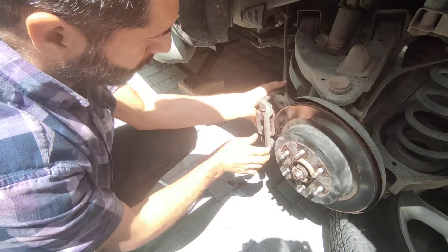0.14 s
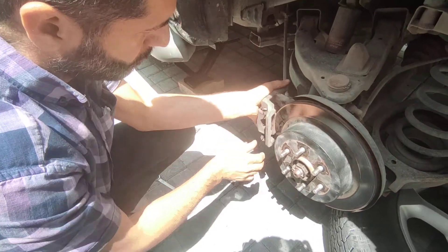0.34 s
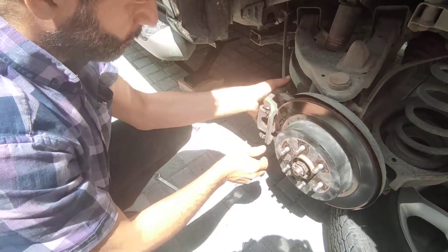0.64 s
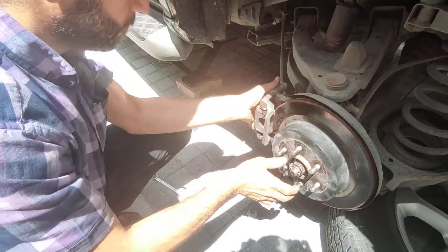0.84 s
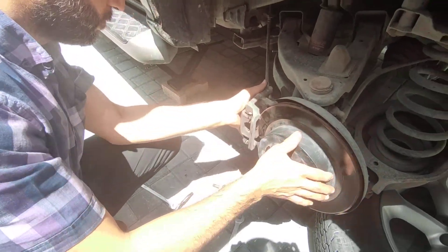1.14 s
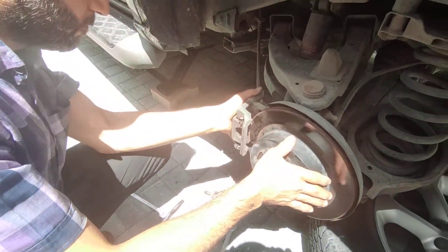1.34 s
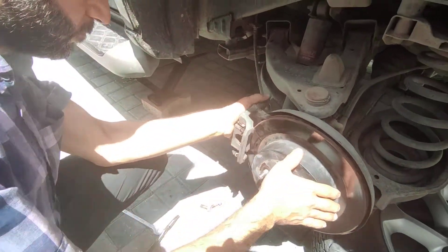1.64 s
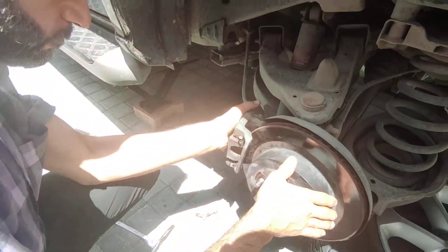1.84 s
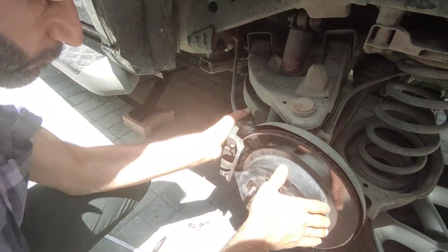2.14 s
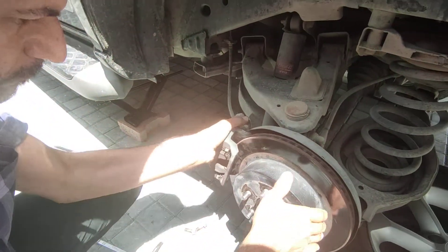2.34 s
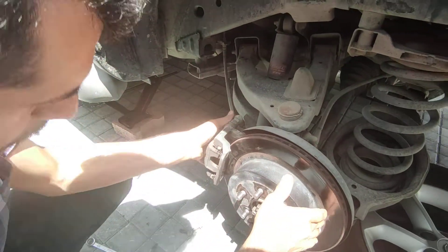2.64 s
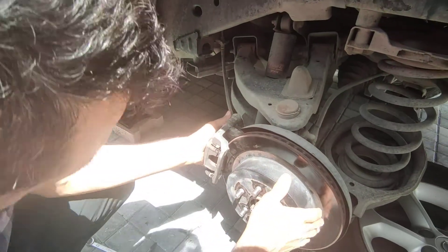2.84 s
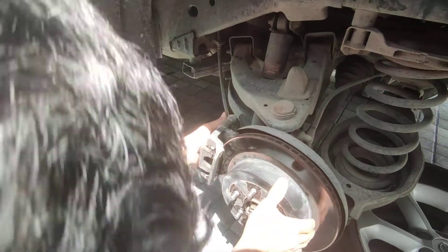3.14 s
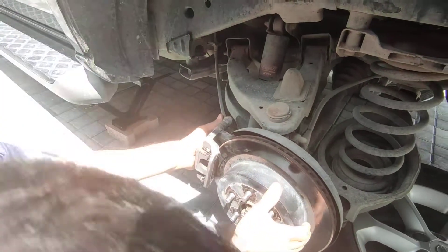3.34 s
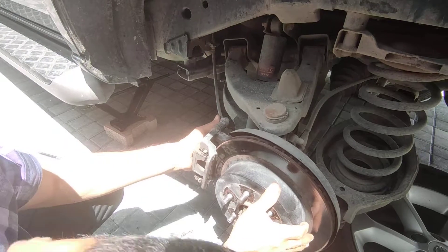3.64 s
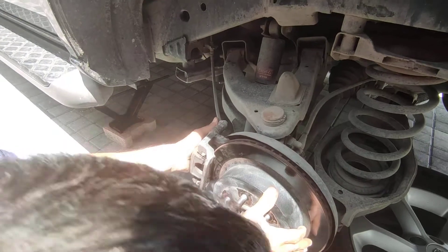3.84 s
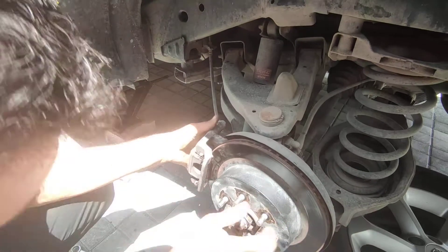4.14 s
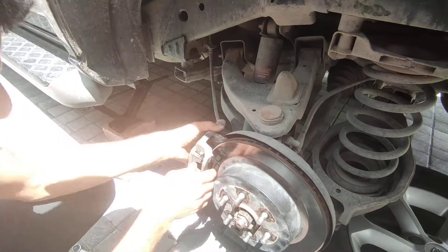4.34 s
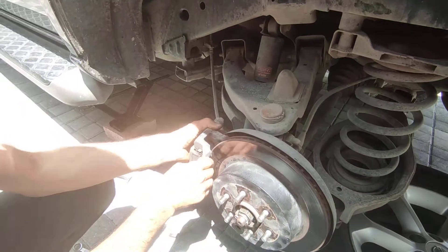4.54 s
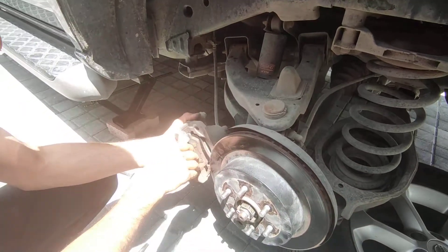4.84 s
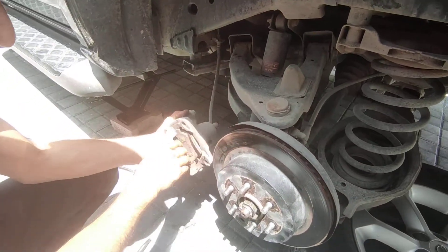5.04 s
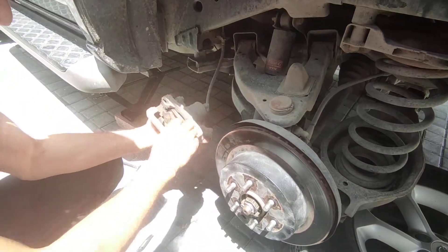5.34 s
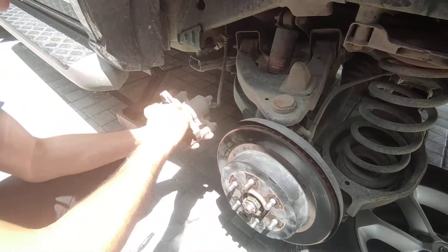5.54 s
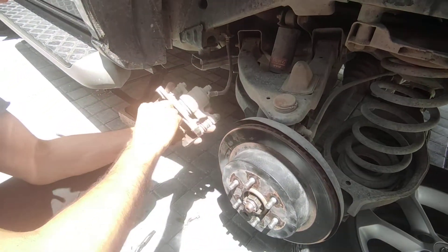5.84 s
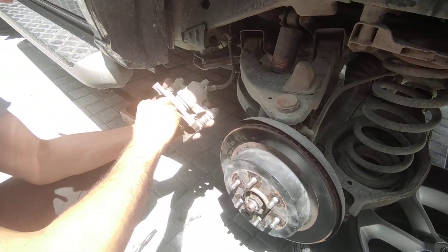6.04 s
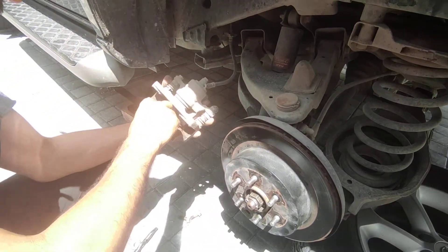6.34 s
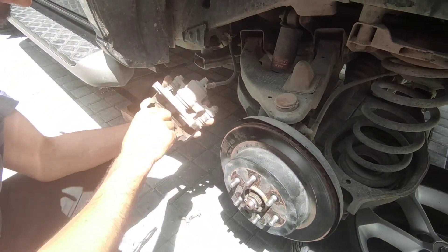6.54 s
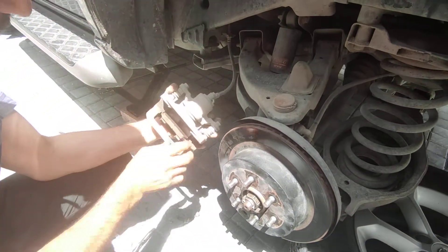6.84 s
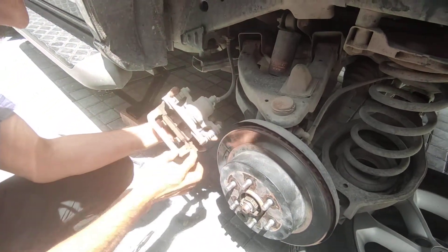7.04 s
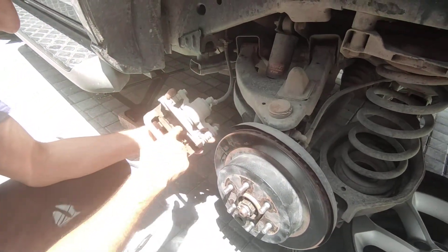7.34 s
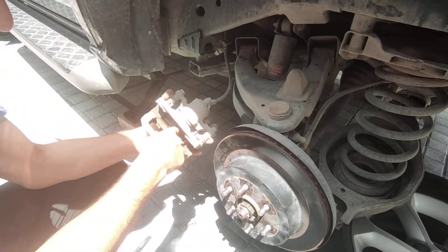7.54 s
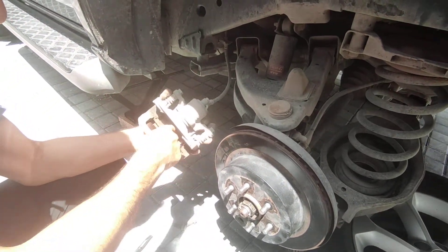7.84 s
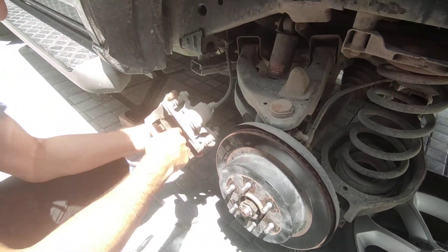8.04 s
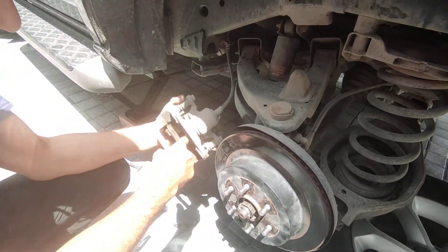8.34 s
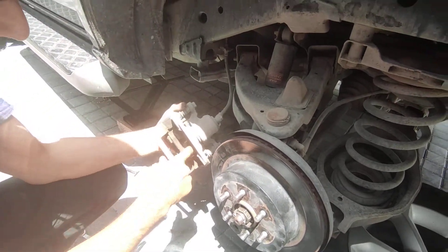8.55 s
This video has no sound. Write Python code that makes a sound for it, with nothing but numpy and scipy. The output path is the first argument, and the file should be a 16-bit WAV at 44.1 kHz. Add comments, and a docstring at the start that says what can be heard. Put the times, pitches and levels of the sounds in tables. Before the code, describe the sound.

Brake disc clunks and rings under rocking hands, a caliper scrapes off and clicks, while wind buffets the microphone and sparrows chirp.

```python
"""Hands close to two microphone ports, outdoors, rock a brake disc, slide the caliper off and finger its pads.
Blows and small hard clicks ring sets of modes and crunch as gritty noise, among rubs, scrapes and squeaks.
Gusts buffet the ports, the left one most, as slow rumble, lumpy flutter and pops.
Sparrows chirp as hoarse gliding tones to the right, a dove coos far off, and the town hums and hisses."""
import sys
import numpy as np
from scipy import signal
from scipy.fft import rfft, irfft, next_fast_len
from scipy.io import wavfile
from scipy.ndimage import uniform_filter1d, map_coordinates

SR = 44100
rng = np.random.default_rng(int(sys.argv[2]) if len(sys.argv) > 2 else 0)


def master(y):
    """Save y as 16-bit WAV."""
    cut = np.clip(np.atleast_2d(y).T, -1, 1)
    pcm = np.round(cut * 32767)  # scale
    wavfile.write(sys.argv[1], SR, pcm.astype(np.int16))


N = 383714

# Modes of the brake disc. Each row: frequency in Hz, relative level in dB, t60 in s.
DISC_MODES = [(493, -2.5, 0.69), (640.3, -3, 0.17), (752, -8, 0.32), (880, -8, 0.54), (1028, -8, 0.43),
              (1291, -11, 0.13), (1382, -12, 1.45), (1529, 0.5, 0.11), (1727, -5.5, 0.19),
              (1804, -14, 0.43), (1936, -9.5, 0.17), (2234, -9, 0.23), (2350, -18, 0.64), (2492, -13, 0.36)]
# Modes of the caliper. Each row: frequency in Hz, relative level in dB, t60 in s.
CALIPER_MODES = [(525, 0.5, 0.064), (946, -3, 0.42), (1539, -8.5, 0.16), (1665, -9.5, 0.097),
                 (1926, -3, 0.4), (2190, -14.5, 0.3), (3050, -22, 0.63), (4330, -24, .3), (5780, -31, 0.37),
                 (6970, -20, 0.38), (7200, -17, .25), (8290, -10, 0.048), (8700, -23, 0.33)]
# Spectrum of a broad gritty contact. Each row: frequency in Hz, relative density in dB per Hz.
IRON_SPECTRUM = [(200, -7), (500, -.5), (1000, -5.5), (2300, -12.5), (3500, -21), (6000, -53.5)]
# How alike near sounds reach the two ports. Each row: frequency in Hz, left-right likeness (0 to 1).
NEAR_LIKENESS = [(200, 0.95), (1000, 0.52), (2500, 0.13), (8000, 0.00996)]


def amp(db):
    """Decibels to an amplitude factor."""
    return 10 ** (np.asarray(db) / 20)


def unit(x):
    """x scaled to an rms of 1 in each channel."""
    return x / np.sqrt(np.mean(x ** 2, axis=-1, keepdims=True) + 1e-20)


def along(points, hz):
    """Reads a curve of (Hz, value) points on a log frequency axis."""
    f, v = np.transpose(points)
    return np.interp(np.log(hz + 1), np.log(f + 1), v)


def wobble(rate, size=N):
    """A smooth random curve with rate knots a second."""
    knots = rng.standard_normal(int(size * rate / SR) + 4)
    return map_coordinates(knots, [np.arange(size) * rate / SR])


def filtered(x, response):
    """x through a filter given as a function of frequency in Hz."""
    m = next_fast_len(x.shape[-1] + 8192)
    spectrum = rfft(x, m) * response(np.fft.rfftfreq(m, 1 / SR))
    return irfft(spectrum, m)[..., :x.shape[-1]]


def noise(spectrum, alike, body=np.ones_like):
    """Stereo noise of rms 1 whose channels share part of their motion, set by frequency."""
    def middle_and_side(hz):
        turn = np.arccos(np.clip(along(alike, hz), -1, 1)) / 2
        return body(hz) * amp(along(spectrum, hz)) * [np.cos(turn), np.sin(turn)]

    mid, side = filtered(rng.standard_normal((2, N)), middle_and_side)
    return unit(np.array([mid + side, mid - side]))


def add(track, s, sound):
    """Mixes a sound into the track at time s."""
    part = track[..., round(max(s, 0) * SR):][..., :sound.shape[-1]]
    part += sound[..., :part.shape[-1]]


def echoes(x, t60, wet_db, dull_hz):
    """x with a diffuse, dulled tail that differs between the channels."""
    t = np.arange(SR // 2) / SR
    tail = rng.standard_normal((2, len(t))) * amp(-60 * t / t60)
    wet = signal.fftconvolve(x, tail / np.linalg.norm(tail[0]), axes=1)[:, :N]
    return x + amp(wet_db) * filtered(wet, lambda hz: 1 / (1 + 1j * hz / dull_hz))


def patchy(x, depth_db):
    """x under a random gain field: rough surfaces excite now one pitch region, now another."""
    z = signal.stft(x, nperseg=256)[2]
    field = uniform_filter1d(rng.standard_normal(z.shape[1:]), size=4, axis=0)
    field = uniform_filter1d(field, size=8, axis=1)
    return signal.istft(z * amp(depth_db * field / field.std()), nperseg=256)[1][:, :N]


def resonant(modes, width_hz, peak_db):
    """What a held part does to grit that passes through it: its damped modes stand out."""
    def response(f):
        peaks = sum((-1) ** k * 1j * f * width_hz / (hz * hz - f * f + 1j * f * width_hz)
                    for k, (hz, _, _) in enumerate(modes))
        return 1 + amp(peak_db) * peaks

    return response


def struck(blows, modes, crunch_t60, chatter_db, pan_db, focus):
    """Every blow is a gritty crunch and rings the given modes, most those near the pitch it favours."""
    # Spectrum of a small hard contact. Each row: frequency in Hz, relative density in dB per Hz.
    thin_spectrum = [(300, -45.5), (1000, -8), (2000, -1.5), (4000, -6.5), (7300, 2.5), (10000, -13),
                     (15500, -32.5)]
    linger_db = -28.5  # the share of each ring that the hand does not damp
    quench_db, quench_s = -7, 0.0043  # a new contact chokes what still rings
    ring, broad, thin = np.zeros((2, N)), np.zeros(N), np.zeros(N)
    t = np.arange(SR * 3 // 4) / SR
    hz, mode_db, t60 = np.transpose(modes)
    luck = rng.standard_normal((len(blows), 3, len(modes)))
    swing = np.exp(2j * np.pi * hz[:, None] * t) * amp(-60 / t60[:, None] * t)
    swing = swing * (1 - np.exp(-t / 0.00044))  # soft onset
    choke = (amp(quench_db) - 1) * (1 - np.exp(-t / quench_s))
    contact = amp(-60 * t / crunch_t60) * (1 - np.exp(-t / 0.0022))

    for (s, crunch_db, ring_db, favoured_hz, damping), (size, lean, turn) in zip(blows, luck):
        level = ring_db + mode_db + 2 * size - focus * np.log2(hz / favoured_hz) ** 2
        # a mode radiates unevenly: the ports get it at their own level and phase, more so in the treble
        apart = np.arccos(np.clip(along(NEAR_LIKENESS, hz), -1, 1)) * turn
        ports = np.array([amp(level + side * lean) * np.exp(.5j * side * apart) for side in (1, -1)])
        bell = (ports @ swing).imag * (amp(-abs(damping) * t) + amp(linger_db))
        # the first touch is followed by a chatter of tiny rebounds over the rust
        chatter = contact[:SR // 10] * rng.standard_normal(SR // 10) ** 3
        chatter = amp(chatter_db) * chatter / np.linalg.norm(chatter)
        touch = chatter + signal.unit_impulse(SR // 10)
        start = round(s * SR)
        still_ringing = ring[:, start:][:, :len(t)]
        add(ring, s, still_ringing * choke[:N - start])
        add(ring, s, signal.fftconvolve(bell, touch[None], axes=1))
        # a small hard contact favours high modes and crunches thin
        hardness = 1 / (1 + (1800 / favoured_hz) ** 4.07)
        add(broad, s, amp(crunch_db) * np.sqrt(1 - hardness) * contact)
        add(thin, s, amp(crunch_db) * np.sqrt(hardness) * contact)

    body = resonant(modes, width_hz=60, peak_db=8)
    crunch = broad * noise(IRON_SPECTRUM, NEAR_LIKENESS, body) + thin * noise(thin_spectrum, NEAR_LIKENESS)
    grit = amp(1.5 * wobble(180)) * crunch
    rattle = amp(2.3 * wobble(110))  # loose parts shake against each other while they ring
    pan = amp([[pan_db / 2], [-pan_db / 2]])
    return (ring * rattle + patchy(grit, depth_db=3.5)) * pan


def squeaks():
    """Stick-slip drives a disc mode briefly and unsteadily as it fades; the ports get it out of step."""
    # A pad edge skids on the disc.
    # Each row: start in seconds, length in seconds, pitch in Hz, level in dB before fade and pan.
    skids = [(1.717, 0.12, 2305, -19.5), (1.718, .1, 2362, -30), (1.719, 0.065, 2750, -28),
             (2.288, 0.1, 2230, -33)]
    track = np.zeros((2, N))
    for s, length, hz, db in skids:
        t = np.arange(round(length * SR)) / SR
        slips = 1 + .5 * wobble(250, size=len(t))
        swell = amp(db - 25 * t / length) * np.sin(np.pi * t / length) ** 0.2
        phase = 2 * np.pi * hz * t + 1.6 * slips + [[0], [1.7]]  # radians, left and right
        add(track, s, swell * slips * np.sin(phase))
    return track * amp([[3.5], [-3.5]])


def handled_parts():
    """Disc and caliper blows, small hard clicks and squeaks; the wheel arch answers with a short tail."""
    # Modes of the small hard clicks of pads, disc and caliper.
    # Each row: frequency in Hz, relative level in dB, t60 in s.
    click_modes = [(1495, 3, 0.24), (2756, -10.5, 0.094), (3550, 5.5, 0.043), (4900, 1, 0.024),
                   (5580, 0, 0.059), (6200, 6, 0.029), (7220, 13, 0.035), (8460, 2, 0.15)]
    # Blows on the disc and on the caliper, and small hard clicks of pads, disc and caliper.
    # Each row: time in seconds, crunch in relative dB, ring in relative dB, favoured pitch in Hz,
    # damping by hand and contact in dB/s.
    disc_blows = [(1.4506, -22, -18, 1400, 449.5), (1.669, -32, -45, 910, 602),
                  (1.727, -22, -18.5, 752, 395.5), (1.747, -27, -21, 780, 250),
                  (1.886, -31.5, -25.5, 640, 504), (1.909, -37, -25, 774, 602), (1.993, -32, -33, 600, 598),
                  (2.006, -23, -14.5, 730, 806), (2.026, -48, -27, 852, 280), (2.121, -38, -32, 501, 400.5),
                  (2.1565, -24.5, -31.5, 1700, 499), (2.208, -28, -22, 910, 306),
                  (2.3895, -28, -25, 1025, 400), (3.664, -52, -40, 497, 298), (3.677, -52, -39, 1540, 40),
                  (3.693, -41, -32, 500, 499.5), (3.710, -39, -30, 1500, 300),
                  (3.720, -35, -24.5, 1600, 499), (3.724, -38, -30, 1330, 4.5)]
    caliper_blows = [(.004, -51.5, -43.5, 1970, 430), (.1176, -44.5, -39, 1750, 160),
                     (.269, -46, -41, 2100, 700), (.431, -36, -31, 2160, 430), (.440, -42, -19, 7800, 430),
                     (.770, -52.5, -38.5, 1720, 580), (.8535, -53.5, -50, 2800, 770),
                     (4.5835, -47, -27, 5000, 30), (4.605, -41.5, -34, 1686, 230),
                     (4.632, -57, -36.5, 1910, 65), (4.719, -53, -31, 1650, 75),
                     (4.849, -50, -43.5, 1980, 50), (4.898, -48, -34, 1880, 430),
                     (4.912, -47, -35, 1650, 480), (4.937, -53, -32, 900, 10),
                     (8.6916, -43.5, -42.5, 1910, 270)]
    click_blows = [(1.669, -40, -41, 4900, 600), (1.982, -43, -54, 5000, 700),
                   (2.1565, -32, -36, 4600, 500), (4.425, -46, -61, 7200, 890),
                   (4.937, -39, -43, 3370, 900), (5.763, -52, -58, 4030, 900),
                   (5.9125, -29.5, -22, 3140, 150), (5.938, -37, -47.5, 8000, 500),
                   (6.024, -44, -48.5, 4760, 700), (6.262, -47.5, -59.5, 3880, 902),
                   (7.660, -50.5, -56, 7260, 903), (8.1434, -40.5, -41.5, 6900, 697)]
    # focus is in dB per squared octave away from the favoured pitch
    disc = struck(disc_blows, DISC_MODES, crunch_t60=0.13, chatter_db=-7.5, pan_db=3.5, focus=9.4)
    caliper = struck(caliper_blows, CALIPER_MODES, crunch_t60=0.18, chatter_db=-9, pan_db=3.0, focus=9.0)
    clicks = struck(click_blows, click_modes, crunch_t60=0.071, chatter_db=-11.0, pan_db=0.5, focus=12.9)
    return echoes(disc + caliper + clicks + squeaks(), t60=0.5, wet_db=-9.5, dull_hz=1197)


def rubbing():
    """Each stroke swells fast and fades; dry skin hisses, rusty steel grinds lower."""
    # Skin and rusty steel sliding.
    # Each row: start in seconds, length in seconds, hiss in relative dB, grind in relative dB.
    strokes = [(0.238, 0.1, -57.5, -51.5), (0.442, 0.21, -51.5, -48), (1.689, 0.13, -42, -32.5),
               (1.807, 0.13, -32.5, -36.5), (1.927, .12, -57, -46), (2.229, 0.15, -54.5, -39.5),
               (2.434, 0.18, -58.5, -46.5), (2.528, 0.5, -62.5, -66.5), (2.908, 0.19, -55, -112),
               (3.222, 0.32, -52.5, -80), (3.657, 0.15, -48.5, -45), (3.921, 0.26, -56.5, -61),
               (4.182, 0.12, -59.5, -76), (4.9, 0.55, -61, -82), (5.169, 0.22, -57, -120),
               (6.687, 0.23, -97, -62.5), (7.28, 0.41, -65.5, -85), (7.565, 0.22, -64.5, -73),
               (8.248, 0.25, -58, -75)]
    # A faint rustle under the strokes. Each row: time in seconds, hiss and grind in relative dB.
    rustle = [(0, -76, -68.5), (2, -62.5, -64.5), (7, -88, -92)]
    # Spectrum of the hiss. Each row: frequency in Hz, relative density in dB per Hz.
    hiss_spectrum = [(1500, -29.5), (3200, -10.5), (5000, -10.5), (6900, -2.5), (8500, -8.5),
                     (11000, -29.5), (15500, -41.5)]
    knots_s, *knots_db = np.transpose(rustle)
    hiss, grind = [amp(np.interp(np.arange(N) / SR, knots_s, level)) for level in knots_db]
    for s, length, hiss_db, grind_db in strokes:
        stroke = np.sin(np.pi * np.linspace(0, 1, round(length * SR)) ** 0.58) ** 2
        add(hiss, s, amp(hiss_db) * stroke)
        add(grind, s, amp(grind_db) * stroke)
    grain = amp(1.36 * wobble(60) + 1.6 * wobble(300))
    skin = hiss * noise(hiss_spectrum, NEAR_LIKENESS)
    body = resonant(DISC_MODES, width_hz=40, peak_db=8.5)
    rust = grind * noise(IRON_SPECTRUM, NEAR_LIKENESS, body) * amp([[1.5], [-1.5]])
    return patchy(grain * (skin + rust), depth_db=2.5)


def scraping():
    """Grit under the dragged caliper keeps its modes singing, the high ones most."""
    # The caliper drags on the disc edge.
    # Each row: start in seconds, length in seconds, drive in dB before the body filter.
    drags = [(0.103, 0.13, -54), (4.575, .13, -48.5), (4.682, 0.21, -56), (4.841, 0.11, -50.5)]
    drag = np.zeros(N)
    for s, length, db in drags:
        add(drag, s, amp(db) * np.sin(np.pi * np.linspace(0, 1, round(length * SR)) ** 0.36))
    grit = amp(4.0 * wobble(150)) * drag * rng.standard_normal((2, N))
    body = resonant(CALIPER_MODES, width_hz=37, peak_db=30.5)

    def response(hz):
        return amp(-15) * body(hz) * (hz / 7000) ** 0.47 / (1 + (hz / 9500) ** 8)

    return filtered(grit, response)


def puffs(port):
    """Flutter and rumble size of a port's puffs: quick rise, hold, exponential release."""
    # Separate puffs. Each row: port, start in seconds, time from start to release in seconds,
    # flutter in relative dB, rumble in relative dB.
    gusts = [("left", 0, 0.049, -23, -25.5), ("left", 0.245, 0.05, -26.5, -27),
             ("left", 0.35, 0.015, -25.5, -32), ("left", .64, 0.095, -30.5, -33),
             ("left", 1.092, 0.045, -29.5, -34.5), ("left", 2.1, 0.18, -33.5, -32),
             ("left", 2.69, 0.062, -31.5, -32), ("left", 2.95, 0.031, -30, -27),
             ("left", 3.48, 0.051, -35, -29.5), ("left", 4.54, 0.083, -36.5, -29),
             ("left", 5.09, 0.072, -34.5, -36), ("left", 5.61, 0.049, -36, -30),
             ("left", 6.08, 0.13, -35.5, -37.5), ("left", 6.23, 0.058, -31, -29.5),
             ("left", 6.61, 0.077, -31, -34.5), ("left", 6.93, 0.11, -33, -33),
             ("left", 7.34, 0.053, -25.5, -33.5), ("left", 7.58, 0.11, -29, -31),
             ("left", 7.83, 0.015, -29.5, -31.5), ("left", 8.09, 0.11, -32.5, -30.5),
             ("left", 7.8, 0.04, -24.5, -32.5), ("left", 8.59, 0.06, -34.5, -34.5),
             ("right", 7.2, 0.043, -32, -44.5), ("right", 7.7, 0.076, -31, -51.5)]
    attack_s, release_s = 0.0091, 0.035
    track, t = np.zeros((2, N)), np.arange(SR // 3) / SR
    for name, s, hold, *db in gusts:
        if name == port:
            release = np.exp(-np.maximum(t - abs(hold), 0) / release_s)
            add(track, s, amp(db)[:, None] * np.minimum(t / attack_s, 1) * release)
    return track


def wind():
    """Each port has its own slow rumble and a lumpy flutter; the strongest puffs pop, reaching higher."""
    # Spectra of the rumble and the flutter. Each row: frequency in Hz, relative density in dB per Hz.
    rumble_spectrum = [(8, -37.5), (20, 0.5), (50, -0.5), (100, -5.5), (300, -72.5) ]
    flutter_spectrum = [(40, -33.5), (90, -4), (175, 1.5), (260, -7.5), (400, -29), (800, -81.5)]
    # The breeze on each port. Each row: time in seconds, strength in dB before its random drift.
    breeze_left = [(0, -43), (.2, -41), (.45, -30.5), (.9, -36), (1.36, -37.5), (1.55, -46), (1.75, -32.5),
                   (2.1, -40), (2.5, -33.5), (2.83, -44.5), (3.1, -40), (3.42, -51), (3.62, -37),
                   (3.95, -36), (4.4, -43), (5.05, -42), (5.419, -49), (6.1, -38.5), (6.45, -45.5),
                   (7.999, -41.5), (8.3, -35.5)]
    breeze_right = [(0, -46), (0.349, -49), (.66, -58), (.85, -44.5), (1.3, -49), (1.6, -56.5), (2.4, -45),
                    (3.05, -46), (3.5, -53.5), (4.3, -50.5), (4.5, -57.5), (5.3, -53), (6.2, -51.5),
                    (6.55, -41.5), (7.45, -39.5), (8.15, -59.5), (8.5, -38)]
    # flutter at the reference strength; it swings wider than the breeze
    flutter_db, flutter_grows, breeze_ref_db = -44, 1.565, -40
    rumble, flutter = noise(rumble_spectrum, [(50, 0.0011)]), noise(flutter_spectrum, [(50, 0.027)])
    lumps = unit(amp(3.4 * np.array([wobble(45), wobble(45)])))
    pops = noise([(150, -26.0), (320, 1.5), (600, -15.0), (1200, -63.5)], [(50, 0.0025)])
    t = np.arange(N) / SR
    ports = []
    for k, (port, breeze) in enumerate([("left", breeze_left), ("right", breeze_right)]):
        strength_db = np.interp(t, *np.transpose(breeze)) + 1.76 * wobble(6)
        fluttering, rumbling = puffs(port)
        breeze_flutter = amp(flutter_db + flutter_grows * (strength_db - breeze_ref_db))
        puff = np.hypot(fluttering, breeze_flutter) * lumps[k]
        slow = np.hypot(rumbling, amp(strength_db)) * rumble[k]
        popping = amp(1.1) * puff ** 1.615 * pops[k]
        ports.append(slow + puff * flutter[k] + popping)
    return np.array(ports)


def thumps():
    """A sudden puff rocks the air in a port for a few cycles."""
    # Sharp pops in the ports. Each row: time in seconds, pitch in Hz, left and right in relative dB.
    port_pops = [(0.351, 255, -5, -62), (2.935, 172, -16, -40), (7.35, 330, -21.5, -43),
                 (8.46, 307, -33, -20.5)]
    track, t = np.zeros((2, N)), np.arange(SR // 10) / SR
    for s, hz, *db in port_pops:
        burst = (t / 0.0039) ** 2 * np.exp(2 - 2 * t / 0.004)
        add(track, s, amp(db)[:, None] * burst * np.sin(2 * np.pi * hz * t))
    return track


def whistle(call, second_hz, second_db, rough):
    """A sparrow's hoarse tone with a second voice above it; pitch and size tremble fast."""
    s, hz, db = np.transpose(call)
    t = np.arange(round(s[-1] * SR)) / SR
    pitch = np.interp(t, s, hz) * (1 + 0.013 * wobble(399.6, size=len(t)))
    phase = 2 * np.pi * np.cumsum(pitch) / SR
    tone = np.sin(phase) + amp(second_db) * np.sin(phase + 2 * np.pi * second_hz * t)
    return amp(np.interp(t, s, db)) * tone * (1 + rough * wobble(695.0, size=len(t)))


def birds():
    """Sparrows to the right among echoing walls, and a far dove's soft notes."""
    # The two sparrow calls. Each row: seconds from the call's start, pitch in Hz, relative level in dB.
    chirrup = [(0, 3720, -3.5), (.012, 4185, 4.5), (.036, 4400, 7), (.041, 3287, 3.5), (.062, 3204, 2),
               (.085, 3647, 9), (.097, 3000, 3.5), (.128, 2880, -20)]
    cheep = [(0, 3900, -11), (.022, 5050, 3), (.048, 4780, 1), (.068, 4100, -12), (.1, 3500, -32),
             (.113, 3700, 2), (.135, 4650, -6.5), (.15, 4760, -2), (.175, 4700, -25)]
    # When each call is heard. Each row: start in seconds, level in dB before pan and echo.
    chirrup_times = [(0.465, -53), (2.945, -56.5), (5.217, -52.5), (8.306, -58)]
    cheep_times = [(.196, -63), (7.351, -54.5)]
    # The dove. Each row: start and length in seconds, pitch in Hz, level in dB before pan and echo.
    coos = [(1.341, 0.2, 574, -53), (7.71, 0.11, 562, -63.5), (7.903, 0.12, 580, -59)]
    track = np.zeros(N)
    for s, db in chirrup_times:
        add(track, s, amp(db) * whistle(chirrup, second_hz=600, second_db=-15, rough=.55))
    for s, db in cheep_times:
        add(track, s, amp(db) * whistle(cheep, second_hz=800, second_db=-2, rough=.8))
    for s, length, hz, db in coos:
        t = np.arange(round(length * SR)) / SR
        add(track, s, amp(db) * np.sin(np.pi * t / length) * np.sin(2 * np.pi * hz * t))
    return echoes(track * amp([[-4], [1.5]]), t60=.4, wet_db=1.5, dull_hz=6000)


def air():
    """The far town's hum and hiss: shaped noise, slowly uneven in level."""
    # Spectrum of the far town. Each row: frequency in Hz, relative density in dB per Hz.
    town_spectrum = [(100, -14), (300, -5), (610, -7.5), (1350, -19), (3070, -22.5), (5130, -26),
                     (7370, -22.5), (9930, -35.5), (15500, -53)]
    level = amp(-63.5 + 1.0 * wobble(1.56))
    return level * noise(town_spectrum, [(200, 0.16), (640, 0.0), (1500, 0.0015)])


def scene():
    """The handled parts close by, the wind in the ports, then the birds and town far off."""
    near = handled_parts() + rubbing() + scraping()
    return near + wind() + thumps() + birds() + air()


def record(dry):
    """Keeps only what lies below a sharp upper band limit."""
    top_hz = 15680
    return filtered(dry, lambda hz: hz < top_hz)


dry = scene()
out = record(dry)
master(out)
```